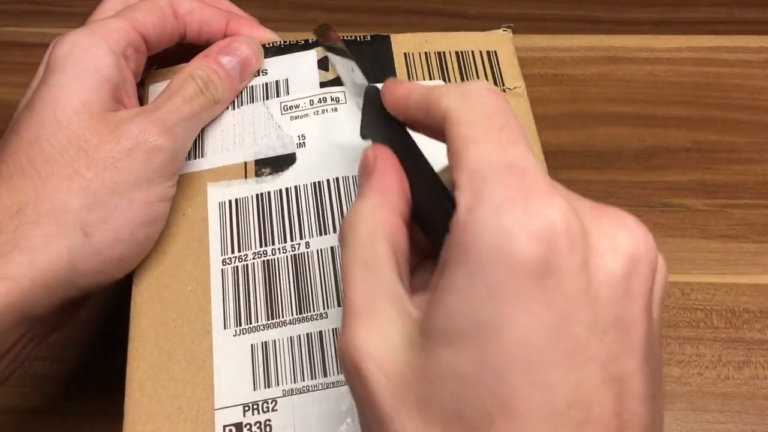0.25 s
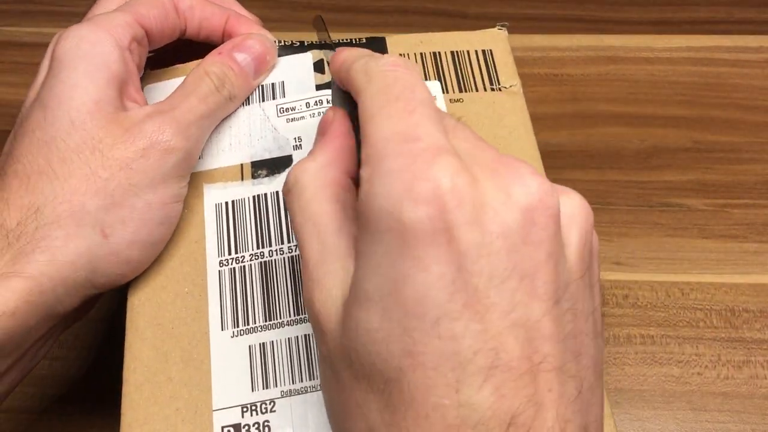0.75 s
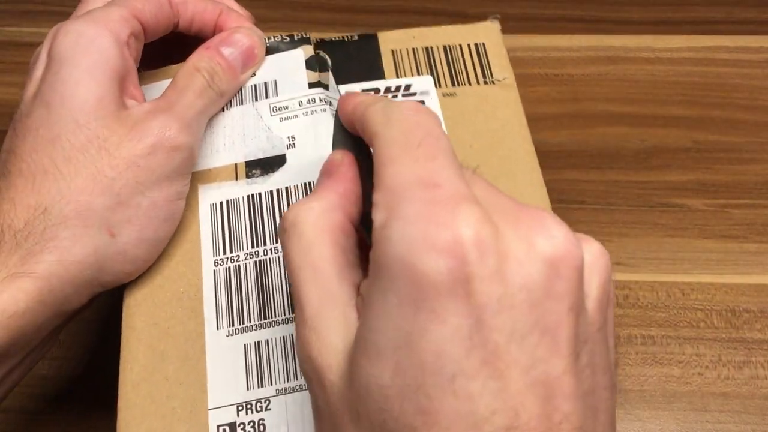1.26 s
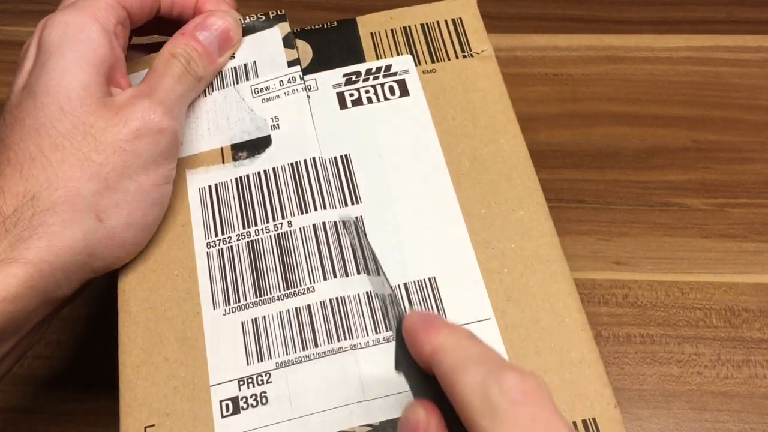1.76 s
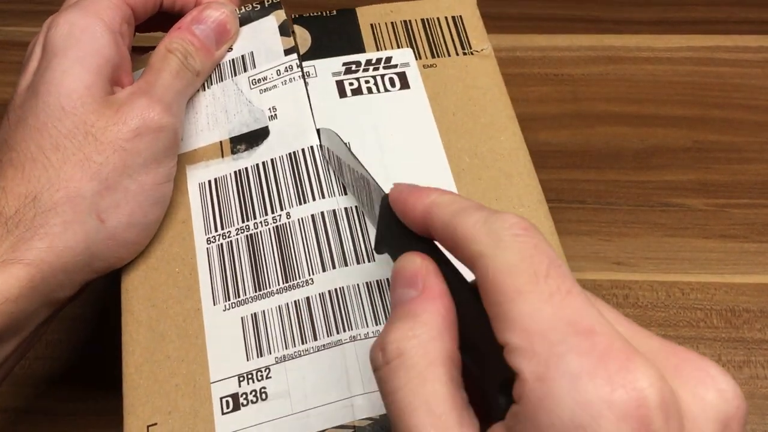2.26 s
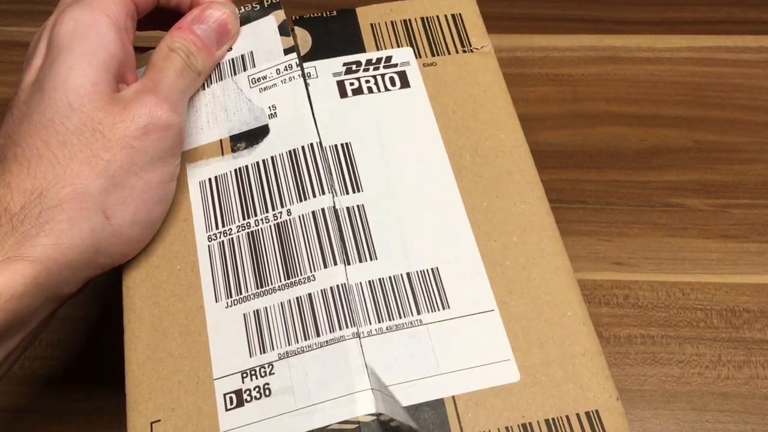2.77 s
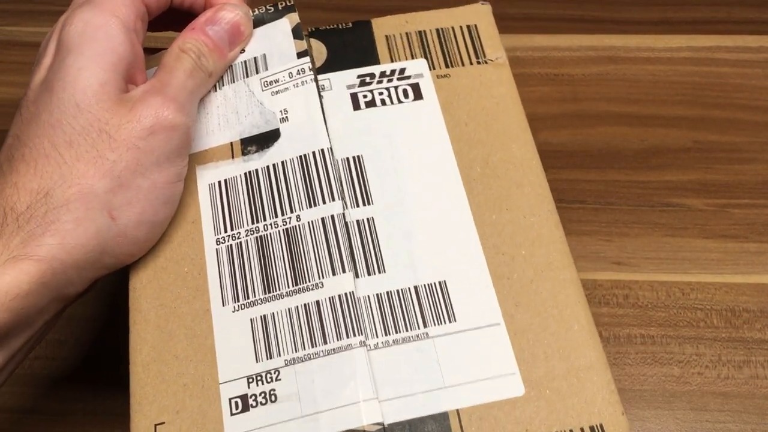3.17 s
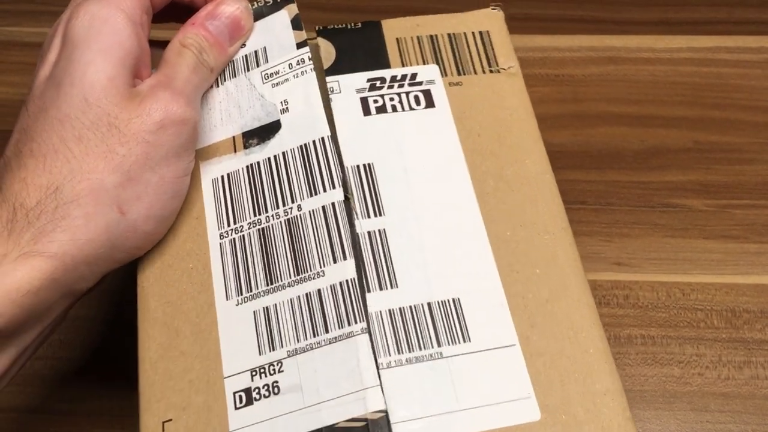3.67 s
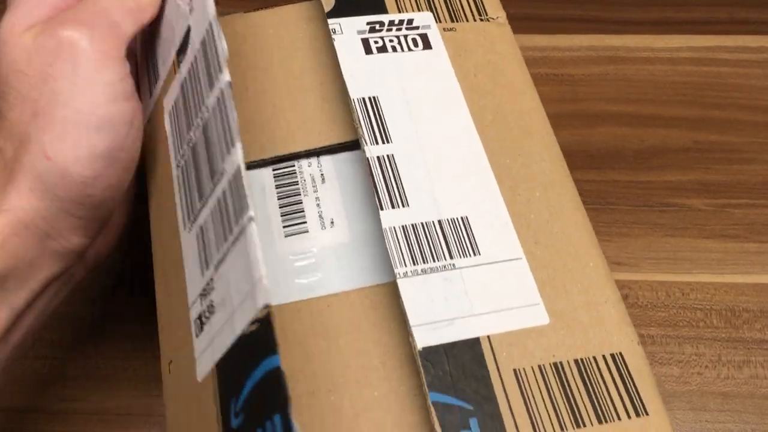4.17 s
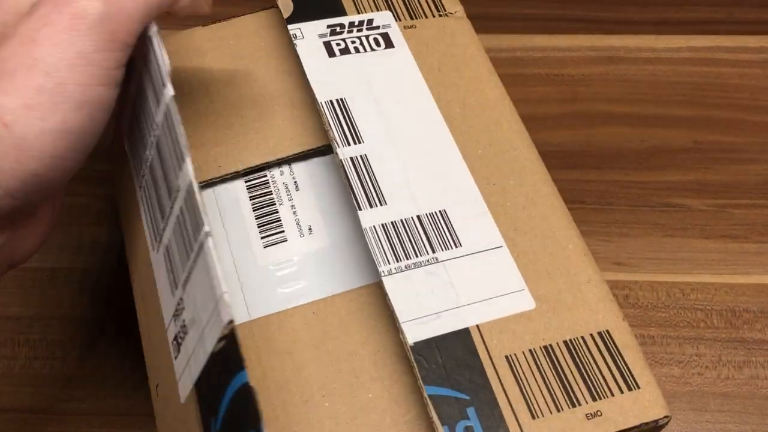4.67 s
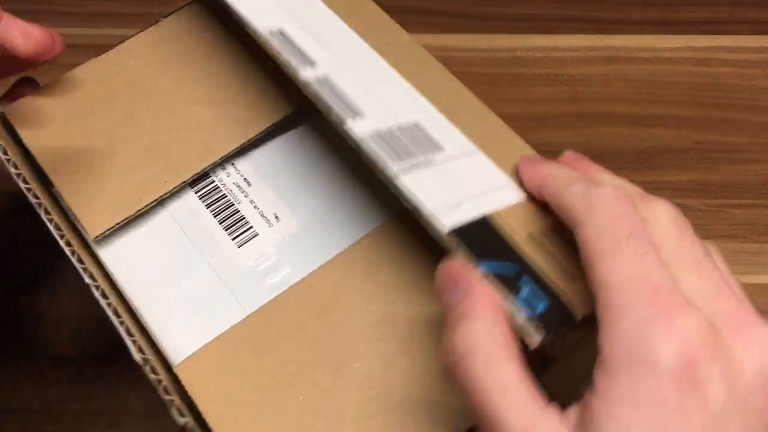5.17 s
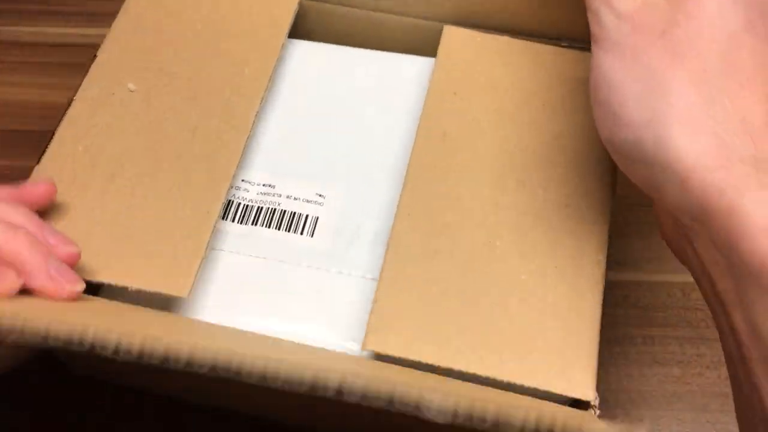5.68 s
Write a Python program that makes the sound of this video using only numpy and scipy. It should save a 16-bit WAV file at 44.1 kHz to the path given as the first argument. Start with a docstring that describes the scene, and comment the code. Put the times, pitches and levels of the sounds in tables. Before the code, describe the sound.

Close, dry cutting rasps and hollow cardboard knocks, a quick tear, then snapping creases and hands sliding over a box on a table.

```python
"""A short click with a soft thump, close to the microphone: a knife opens a small taped cardboard box
on a wooden table in a small room. The blade pokes in, slices the seam in two strokes and knocks on the lid;
the last of the label tears, then creases crack as the flaps fold back and hands slide over the board.
Filtered noise makes rubbing and breaking fibres, decaying sines ring in the knocks and thumps,
and decaying noise gives the room's answer over a faint steady background."""
import sys
import numpy as np
from scipy import signal
from scipy.fft import rfft, irfft, next_fast_len
from scipy.io import wavfile
from scipy.ndimage import uniform_filter1d, map_coordinates

SR = 44100
rng = np.random.default_rng(int(sys.argv[2]) if len(sys.argv) > 2 else 0)


def to_wav(sig):
    """Store sig (one row per channel, or 1-D mono) as 16-bit WAV at the path in sys.argv[1].

    Samples outside -1..1 are clipped; the rate is SR.
    """
    pcm = np.clip(np.atleast_2d(sig), -1, 1) * 32767
    pcm = np.round(pcm).astype(np.int16)
    wavfile.write(sys.argv[1], SR, pcm.T)  # frames by channels


N = 261423
TIME = np.arange(N) / SR  # s
HIT = TIME[:SR // 3]  # s since a contact

# strokes of the blade: the tip works in, then two passes along the seam, the second through the label
# [start_s, length_s, swell_db from start to end, relative levels board_db, rasp_db, hiss_db, shudder_db,
#  panel_hz, rasp_hz]
BLADE_STROKES = [(0.327, 0.077, 1.5, -47.5, -50, -48, -47.5, 540, 2090),
                 (0.498, .09, -4, -51, -55, -60.5, -59, 1030, 2120),
                 (1.011, 0.087, -1, -54, -54, -63.5, -58, 745, 2070),
                 (1.122, .2, -17, -42, -45.5, -51, -43, 650, 2220),
                 (1.383, .08, -1.5, -38, -38.5, -37, -39.5, 1020, 5870),
                 (1.49, .175, 0.5, -36.5, -42.5, -38, -37, 970, 3070),
                 (1.691, .15, 0.5, -45.5, -50.5, -47, -42, 620, 2360),
                 (1.868, .11, -7, -39, -43.5, -46, -38.5, 630, 2900),
                 (2.444, 0.092, -5, -49, -56.5, -52, -52.5, 645, 2400),
                 (2.585, 0.032, 2, -23, -30, -30.5, -32.5, 600, 2490),
                 (2.647, .19, -4, -38, -42.5, -38, -38, 750, 2400),
                 (2.87, .15, -5, -41, -42, -35, -36.5, 890, 2380),
                 (3.033, .045, 3, -40, -43.5, -29.5, -43.5, 1140, 2250),
                 (3.102, 0.082, -3, -39, -47.5, -41.5, -43, 1110, 2530)]
# flaps and hands slide: the first flap is lifted, its crease bent back in two pushes, then the second flap
# while palms rustle on the tipped box [same columns as the blade strokes]
HAND_SLIDES = [(3.412, .085, -2, -38.5, -48.5, -48, -44.5, 980, 2240),
               (3.57, .13, 8.5, -40.5, -47, -41.5, -36.5, 1130, 2480),
               (3.732, 0.027, -1.5, -29.5, -34, -34, -30, 1110, 2300),
               (3.853, 0.22, -9.5, -77, -62, -63.5, -49, 1160, 2230),
               (4.349, .06, -5.5, -51, -44, -47, -52.5, 1430, 4250),
               (4.459, 0.22, -1.5, -58, -54.5, -51, -54.5, 900, 3840),
               (4.684, .08, -3, -37, -33, -51, -45, 544, 3370),
               (4.786, .14, -7.5, -40, -38, -55.5, -45.5, 760, 1690),
               (5.009, .15, -4, -51, -50.5, -51.5, -47.5, 840, 2220),
               (5.337, .105, 3.5, -46.5, -52.5, -45.5, -48, 900, 2820),
               (5.45, .012, -1.5, -39, -41.5, -38.5, -50, 824, 2750),
               (5.199, .65, 0.5, -67, -57.5, -52, -67, 930, 2700),
               (5.59, 0.056, -2.5, -56, -53, -42.5, -53.5, 900, 2700),
               (5.8, 0.022, 1.5, -44.5, -42, -36, -44, 980, 2670),
               (5.895, .035, -0.5, -54, -51.5, -42, -74, 980, 2620)]
# spectrum of the cardboard panels [frequency_hz, relative level_db]
PANEL_SPECTRUM = [(230, -12), (370, -3), (530, -6), (600, -7), (720, -5), (920, -6), (1200, -5.5),
                  (1500, -7), (2100, -28.5)]
# spectrum of torn fibres [frequency_hz, relative level_db]
FIBRE_SPECTRUM = [(1000, -23.5), (1500, 0.5), (2200, 2.5), (2900, -1.5), (4200, -3.5), (6000, -4.5),
                  (8000, -13.5)]
# spectrum of a sharp crack in tape or crease [frequency_hz, relative level_db]
CRACK_SPECTRUM = [(4500, -22), (6200, 1), (8500, 1.5), (10200, 4.5), (12500, 4.5), (15500, 4),
                  (17000, -8.5)]


def amp(db):
    """Decibels to gain."""
    return 10 ** (np.asarray(db) / 20)


def unit(x):
    """Scale to rms 1."""
    return x / np.sqrt(np.mean(x ** 2) + 1e-20)


def burst(x):
    """Scale a short sound to the energy of 10 ms at rms 1."""
    return x / np.sqrt(np.sum(x ** 2) / (.01 * SR) + 1e-20)


def add(track, s, sound):
    """Mix a sound into the track at time s."""
    start = max(round(s * SR), 0)
    track[start:start + len(sound)] += sound[:N - start]


def along(points, hz):
    """Read (Hz, value) points on a log frequency axis."""
    f, value = np.transpose(points)
    return np.interp(np.log(hz + 1), np.log(f), value)


def wobble(count, size):
    """A smooth random curve of spread about 1, with count knots over size samples."""
    return map_coordinates(rng.standard_normal(count + 2), [np.linspace(0, count, size)])


def hump(hz, centre_hz, width):
    """A resonance on a log axis, top 1, falling to one half at width octaves from its centre."""
    return 1 / (1 + (np.log2((hz + 1) / centre_hz) / width) ** 2)


def colour(x, spectrum, ripple_db=0, peak_hz=1000, peak_db=0, count=150):
    """Causal filter with one main resonance; the ripple stands for the many small ones."""
    m = next_fast_len(len(x) + 4096, True) // 2 * 2
    hz = np.fft.rfftfreq(m, 1 / SR)
    below = np.maximum(np.log2(spectrum[0][0] / (hz + 1)), 0)
    above = np.maximum(np.log2((hz + 1) / spectrum[-1][0]), 0)
    skirts_db = -10 * (below + above)  # 10 dB per octave outside the points
    peaks_db = peak_db * hump(hz, peak_hz, width=0.14) + ripple_db * wobble(count, len(hz))
    # folding the cepstrum forward gives minimum phase: no sound ahead of the contact
    cepstrum = irfft(np.log(amp(along(spectrum, hz) + skirts_db + peaks_db)), m)
    cepstrum[1:m // 2] *= 2
    cepstrum[m // 2 + 1:] = 0
    return irfft(rfft(x, m) * np.exp(rfft(cepstrum)), m)[:len(x)]


def resonate(x, modes):
    """Pass x through (Hz, width in Hz, dB) resonances."""
    m = next_fast_len(len(x) + SR // 10)
    f = np.fft.rfftfreq(m, 1 / SR)
    body = sum(amp(db) * 1j * f * w / (c * c - f * f + 1j * f * w) for c, w, db in modes)
    return irfft(rfft(x, m) * body, m)[:len(x)]


def place(s):
    """The place of contact picks the resonances of panel and fibres; they glide from stroke to stroke."""
    start, length, *_, panel_hz, rasp_hz = np.transpose([*BLADE_STROKES, *HAND_SLIDES])
    middle = start + length / 2
    return [np.interp(s, middle, hz) for hz in (panel_hz, rasp_hz)]


def crack_at(s):
    """Resonance of a crack in Hz: tape up to 4.5 s, bending creases from then on."""
    return np.where(s < 4.5, 13040, 10700)


def stroke_power(rows, rise, fall):
    """Power of board, rasp, hiss and shudder: strokes rise, swell or fade evenly, and fall (dB per s)."""
    power = np.zeros((4, N))
    for start, length, swell_db, *levels_db, _, _ in rows:
        near = slice(*np.searchsorted(TIME, [start - .2, start + length + .2]))
        t = TIME[near] - start
        shape_db = swell_db * (np.clip(t / length, 0, 1) - .5)
        shape_db = shape_db - rise * np.maximum(-t, 0) - fall * np.maximum(t - length, 0)
        power[:, near] += np.outer(amp(levels_db), amp(shape_db)) ** 2
    return power


def effort():
    """Relative levels in dB of board, rasp, hiss and shudder under blade and hands together."""
    # the hand that steadies the box [relative levels board_db, rasp_db, hiss_db, shudder_db]
    holding_db = [-70.5, -68, -67, -59]
    blade = stroke_power(BLADE_STROKES, rise=546, fall=330)  # the blade grips and lets go
    hands = stroke_power(HAND_SLIDES, rise=426.5, fall=406)
    holding = amp(holding_db)[:, None] ** 2
    uneven_db = 1.26 * wobble(count=360, size=N)  # the pressure of the hand wavers
    return 10 * np.log10(blade + hands + holding) + uneven_db


def catches(rate, spread_db, life, smooth):
    """Stick and slip: tiny releases, rate per s, of uneven size, fading over life s, on smooth sliding."""
    sizes = amp(spread_db * np.clip(rng.standard_normal(N), -2, 2))
    slips = (rng.random(N) < rate / SR) * sizes ** 2
    power = signal.lfilter([1], [1, -np.exp(-1 / (life * SR))], slips)
    return unit(np.sqrt(power / power.mean() + smooth))


def drift(x, centre_hz, peak_db, width, depth_db):
    """Resonances shift as the contact travels over the board: one strong, many weak."""
    hz, t, z = signal.stft(x, SR, nperseg=512)
    field = uniform_filter1d(rng.standard_normal(z.shape), size=3, axis=0)
    field = uniform_filter1d(field, size=24, axis=1)
    main = hump(hz[:, None], np.interp(t, TIME, centre_hz), width)
    moving = z * amp(peak_db * main + depth_db * unit(field))
    return unit(signal.istft(moving, nperseg=512)[1][:N])


def rubbing(board_db, rasp_db, hiss_db):
    """The edge catches on fibres; each catch sounds in panel, fibres and tape at once."""
    # spectrum of the edge on the tape [frequency_hz, relative level_db]
    tape_spectrum = [(4500, -19), (6200, -7), (8000, -5.5), (10500, -3.5), (13000, 0), (15500, -2.5),
                     (17000, -1.5)]
    panel_hz, rasp_hz = place(TIME)
    grain = catches(rate=420, spread_db=2.8, life=.0008, smooth=.35)
    # skin and loose flaps slide more evenly than the blade cuts
    bite = np.interp(TIME, [3.1, 3.3], [.95, .75])

    def scrape(spectrum, share):
        """Noise that follows the catches by the given share."""
        return colour((share * grain + 1 - share) * rng.standard_normal(N), spectrum)

    # the heavy panel follows single catches less than the tape does
    board = drift(scrape(PANEL_SPECTRUM, bite / 2), panel_hz, peak_db=12, width=.34, depth_db=2.8)
    rasp = drift(scrape(FIBRE_SPECTRUM, .8 * bite), rasp_hz, peak_db=7, width=.15, depth_db=2.8)
    hiss = drift(scrape(tape_spectrum, bite), crack_at(TIME), peak_db=0.5, width=0.23, depth_db=3.0)
    return amp(board_db - 3.0) * board + amp(rasp_db - 0.5) * rasp + amp(hiss_db + 1.0) * hiss


def shudder(level_db):
    """Dragging and bending shake the hollow box at its low resonances."""
    # low resonances of the box [frequency_hz, width_hz, relative level_db]
    box_modes = [(69, 14, -28), (135.4, 3.8, 9.5), (159, 99, -3.5), (209, 70, -2), (280, 310, -12.5)]
    hollow = resonate(rng.standard_normal(N), box_modes)
    hollow = colour(hollow, [(25, -32), (60, 0.5), (350, -0.5), (600, -41.0)])
    return amp(level_db - 2.0) * unit(hollow)


def fracture(hold, t60):
    """A run of breaking fibres: the first is the hardest, the rest go on for hold seconds and die."""
    first = .7 * np.exp(-HIT / .0004)
    rest = amp(-60 * np.maximum(HIT - hold, 0) / t60)
    return rng.standard_normal(len(HIT)) * (first + rest)


def clack(s, hardness_db, hold, t60):
    """The fibre layer answers a contact; a soft one, with little crack, loses its upper range."""
    tilt_db = np.clip(1.35 * hardness_db, -9, 2)  # per octave above 2400 Hz
    spectrum = [(hz, db + tilt_db * max(np.log2(hz / 2400), 0)) for hz, db in FIBRE_SPECTRUM]
    return burst(colour(fracture(hold, t60), spectrum, ripple_db=3.1, peak_hz=place(s)[1], peak_db=6.5))


def thump(hz, t60):
    """The whole lid swings on the air inside and shakes the walls."""
    swing = np.sin(2 * np.pi * hz * HIT) * amp(-60 * HIT / t60) * (1 - np.exp(-HIT / 0.0095))
    wall_spectrum = [(30, -63.5), (70, -21), (140, 1.0), (250, 3.5), (380, -5.5), (600, -16.5)]
    walls = colour(fracture(hold=0.0042, t60=0.048), wall_spectrum)
    return burst(burst(swing) + 0.79 * burst(walls))


def knocks():
    """A crack at the contact, then the panel knocks and the lid thumps; a soft contact gives only the thump."""
    # blade or flap strikes the box
    # [start_s, relative levels crack_db, clack_db, knock_db, knock_hz, thump_db, thump_hz, thump_t60_s]
    blows = [(0.2792, -37, -28, -25.5, 506, -27.5, 171, 0.052),
             (0.652, -92, -69, -52.5, 688, -51, 123, .074),
             (0.7668, -39.5, -40.5, -50.5, 705, -51, 115, 0.07),
             (1.1015, -22, -19, -16, 700, -29.5, 333, .21),
             (2.051, -30.5, -33, -27, 954, -22.5, 162, 0.016),
             (2.2195, -53, -43.5, -36, 660, -32.5, 143, 0.091), (2.335, -42, -36, -30, 644, -26, 132, 0.13),
             (2.86, -36, -41.5, -32.5, 780, -26, 159, 0.057),
             (3.709, -27.5, -30.5, -29.5, 850, -16, 165, 0.04),
             (3.7359, -23, -29, -25.5, 1240, -21, 203, 0.031),
             (3.829, -31, -36, -25, 985, -22.5, 225, 0.018),
             (4.665, -23.5, -23, -25.5, 550, -27, 235, 0.095),
             (4.771, -39, -28.5, -29, 486, -33.5, 132, 0.12),
             (5.025, -42.5, -42.5, -45, 750, -30.5, 207.6, 0.38),
             (5.361, -37, -43, -39.5, 1360, -42.5, 200, .09), (5.819, -43, -42, -47, 760, -37.5, 109, 0.1)]
    # soft low thumps of the box [start_s, relative level_db]
    soft_thumps = [(0.014, -38.5), (0.403, -41.5), (0.707, -48.5), (0.981, -46), (1.159, -44.5),
                   (1.887, -33), (4.273, -38.5), (4.465, -41), (5.748, -38), (5.845, -44)]
    out = np.zeros(N)
    for s, crack_db, clack_db, knock_db, knock_hz, thump_db, thump_hz, t60 in blows:
        crack = fracture(hold=0.0015, t60=0.02)
        crack = burst(colour(crack, CRACK_SPECTRUM, ripple_db=1.5, peak_hz=crack_at(s), peak_db=3.0))
        fibres = clack(s, crack_db - clack_db, hold=0.0032, t60=0.011)
        add(out, s, amp(crack_db) * crack + amp(clack_db) * fibres)
        panel = burst(colour(fracture(hold=0.001, t60=0.049), PANEL_SPECTRUM))
        ring = burst(np.sin(2 * np.pi * knock_hz * HIT) * amp(-60 * HIT / 0.029))
        knock = burst(panel + 1.56 * ring)
        # the larger parts speak a little later
        add(out, s + 0.00116, amp(knock_db) * knock + amp(thump_db) * thump(thump_hz, t60))
    for s, db in soft_thumps:
        add(out, s, amp(db) * thump(hz=144, t60=0.055))
    return out


def snap(s, length, crack_db, clack_db, board_db):
    """A snap, tick or short scrape: brief noise in crack, fibres and board, with a colour of its own."""
    crack = fracture(hold=length, t60=0.006)
    crack = burst(colour(crack, CRACK_SPECTRUM, ripple_db=1.0, peak_hz=crack_at(s), peak_db=8.5))
    fibres = clack(s, crack_db - clack_db, hold=length + 0.0052, t60=0.02)
    board = fracture(hold=length, t60=0.028)
    board = burst(colour(board, PANEL_SPECTRUM, ripple_db=5.0, peak_hz=place(s)[0], peak_db=0.5))
    return amp(crack_db) * crack + amp(clack_db) * fibres + amp(board_db) * board


def snaps():
    """Snaps of tape and crease, with small ticks and short scrapes."""
    # snaps, ticks and short scrapes, some very faint
    # [start_s, hold_s before it dies, relative levels crack_db, clack_db, board_db]
    snap_rows = [(0.001, 0.00033, -33, -31, -29), (0.025, 0.014, -42, -44.5, -54),
                 (0.274, 0.00076, -52, -58, -36.5), (0.401, 0.015, -33, -40, -53),
                 (0.499, 0.0027, -45.5, -43.5, -47), (0.541, 0.0035, -57, -49, -53),
                 (0.778, 0.0049, -51.5, -44.5, -49), (1.3822, 0.0012, -36, -34.5, -40),
                 (1.845, 0.00062, -39, -38.5, -40.5), (2.3296, 0.0045, -42, -46, -44),
                 (2.577, 0.0059, -26, -28, -30.5), (2.892, 0.0013, -39, -38, -48.5),
                 (2.916, 0.00085, -37.5, -40, -50), (3.388, .002, -50, -53, -45),
                 (3.753, .009, -26, -35, -30.5), (4.2598, 0.0056, -23, -33.5, -38),
                 (4.331, 0.0039, -29.5, -32, -43), (4.357, 0.0057, -39, -44, -50),
                 (4.6614, .001, -42, -25.5, -27), (4.6744, .001, -19, -22, -34),
                 (4.6985, .001, -31, -32, -38), (4.792, 0.0013, -30, -33, -35),
                 (4.7975, 0.00088, -26.5, -42, -44), (4.812, .001, -39.5, -38, -38),
                 (4.8408, 0.0017, -31, -35, -39), (4.8684, .002, -38, -39, -40),
                 (5.338, 0.00078, -38, -52, -47.5)]
    out = np.zeros(N)
    for row in snap_rows:
        add(out, row[0], snap(*row))
    return out


def crackle(board_db, rasp_db, hiss_db, count=16, level_db=-4, spread_db=2):
    """Small bundles break at random, most often where the rubbing is hardest; their level follows it."""
    out = np.zeros(N)
    strain = np.cumsum(np.sqrt(amp(rasp_db) + amp(hiss_db)))
    # one break at random in each equal share of the strain
    shares = (np.arange(count) + rng.random(count)) / count
    moments = np.searchsorted(strain, shares * strain[-1])
    for i, size in zip(moments, 2 * rng.random(count) - 1):
        small = snap(i / SR, .001, hiss_db[i], rasp_db[i], board_db[i])
        add(out, i / SR, amp(level_db + spread_db * size) * small)
    return out


def bumps(table_hz=62):
    """The tilted box settles with soft thuds of the table top."""
    # the box rocks on the table [start_s, relative level_db]
    rocks = [(5.031, -33), (5.37, -38.5), (5.751, -38.5), (5.841, -42.5)]
    out = np.zeros(N)
    swing = np.sin(2 * np.pi * table_hz * HIT) * amp(-60 * HIT / 0.15)
    thud = burst(swing * (1 - np.exp(-HIT / .008)))
    for s, db in rocks:
        add(out, s, amp(db) * thud)
    return out


def room(x):
    """The walls' answer builds up over about a millisecond, then dies, soonest in the high treble."""
    # reverberation of the room [frequency_hz, t60_s]
    decay = [(100, 0.52), (500, 0.61), (2000, 0.7), (6000, 0.43), (15000, 0.19)]
    hz, t, z = signal.stft(rng.standard_normal(SR // 2), SR, nperseg=256)
    fading = z * amp(-60 * t / along(decay, hz)[:, None])
    tail = signal.istft(fading, SR, nperseg=256)[1]
    tail = tail * (1 - np.exp(-TIME[:len(tail)] / 0.0013))
    wet = signal.fftconvolve(x, tail / np.linalg.norm(tail))[:N]
    return colour(wet, [(40, 4), (300, -3.5), (2000, -2), (6000, -1.0), (15000, 3.5)])


def background():
    """The room's faint steady noise, strongest in the bass."""
    # spectrum of the quiet room [frequency_hz, relative level_db]
    quiet_spectrum = [(20, 16), (60, 9.5), (140, 6), (400, -5.5), (1000, -3.5), (4000, -36), (9000, -18),
                      (16000, -69)]
    return amp(-58.5) * unit(colour(rng.standard_normal(N), quiet_spectrum))


def scene():
    """Box sounds, their echo and the room's faint background."""
    *levels_db, shudder_db = effort()
    friction = rubbing(*levels_db) + shudder(shudder_db) + bumps()
    hits = knocks() + snaps() + crackle(*levels_db)
    # the air in the box hums on after each blow
    hits = hits + resonate(hits, [(133.5, 2.6, 0)])
    echo = room(amp(-12.5) * hits + amp(-11.5) * friction)
    return (hits + friction + echo + background())[None]


def record(dry):
    """The microphone thins the deepest bass; a steep filter cuts what lies above 15850 Hz."""
    bass = signal.butter(2, 48, "highpass", fs=SR, output="sos")
    top = signal.ellip(10, .3, 80, 15850, fs=SR, output="sos")
    return signal.sosfilt(np.vstack([bass, top]), dry)


dry = scene()
out = record(dry)
to_wav(out)
```